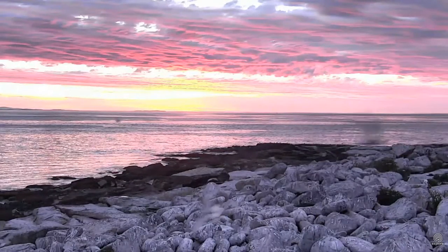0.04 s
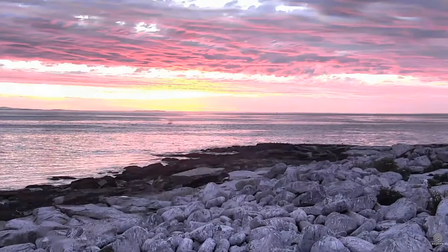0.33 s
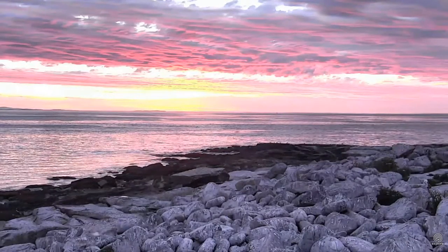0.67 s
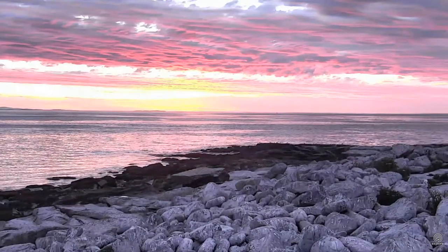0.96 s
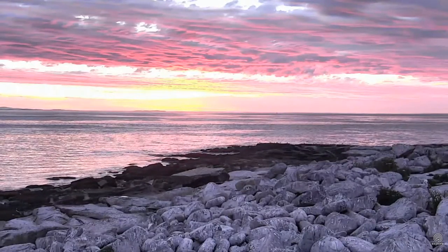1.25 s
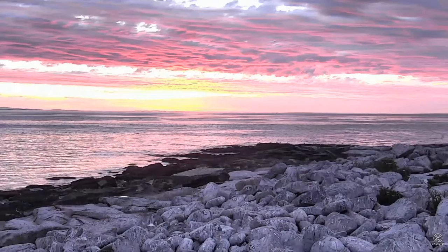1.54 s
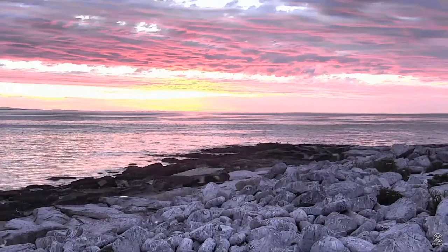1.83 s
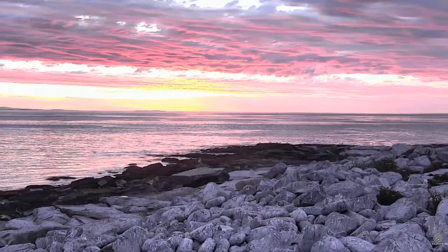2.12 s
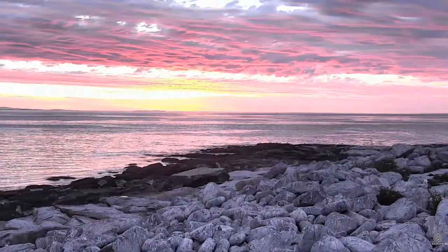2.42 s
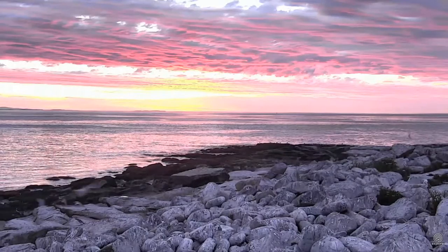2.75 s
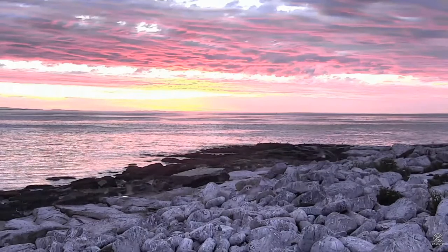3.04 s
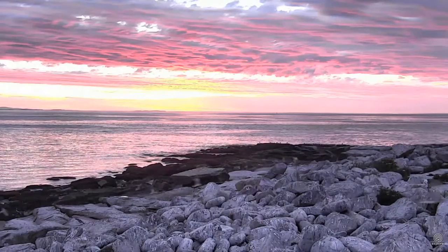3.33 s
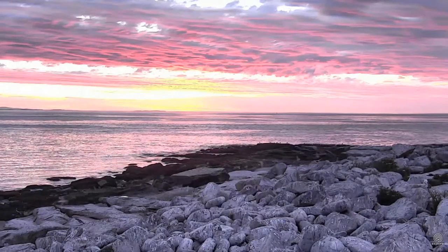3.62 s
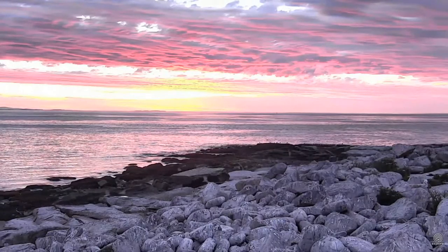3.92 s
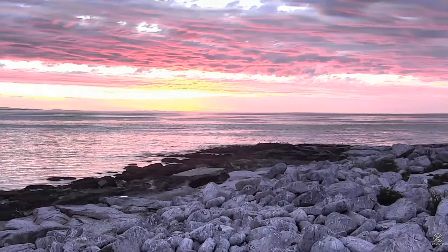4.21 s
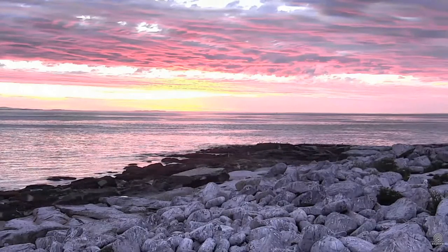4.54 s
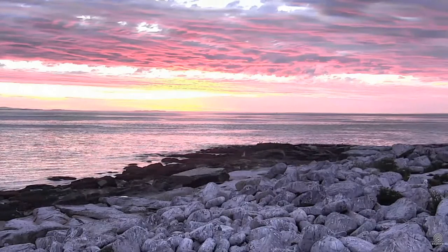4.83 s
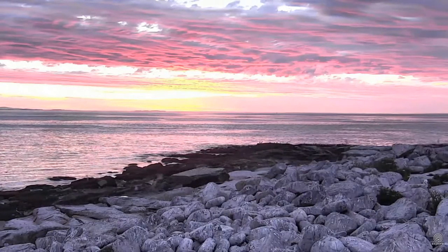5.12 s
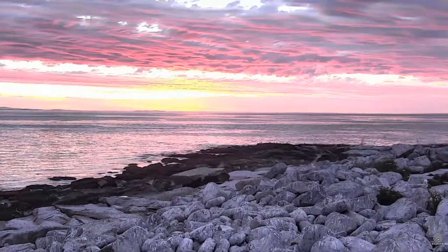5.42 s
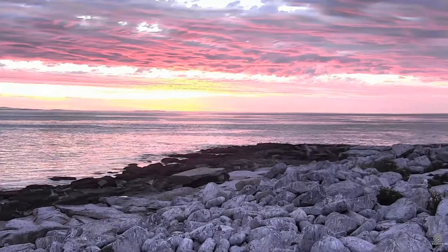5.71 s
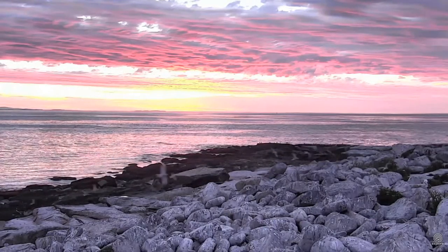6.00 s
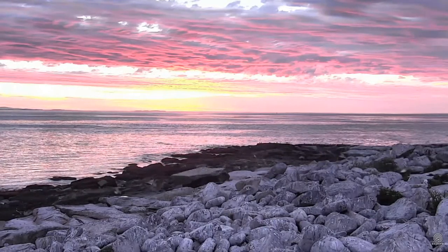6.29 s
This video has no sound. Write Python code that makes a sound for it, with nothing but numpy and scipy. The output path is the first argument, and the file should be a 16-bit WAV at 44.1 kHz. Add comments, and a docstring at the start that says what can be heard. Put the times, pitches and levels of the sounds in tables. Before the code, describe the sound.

A seabird screams harshly close to the microphone, its call arching up and dropping into a rattle. Other terns answer from around the rocky shore with short sharp notes, thin whistles, rasps and far cries. After a quieter middle stretch broken by one whistle, several nearer screams follow, the last the loudest. Underneath, the blurred voices of the colony swell and fade above a faint wash of sea.

```python
"""A rocky shore by a calm sea, home to a colony of terns. Birds pass close with harsh 'kee-arr' screams;
others answer with rasps, thin whistles, short 'kek' notes and far calls. A bird's voice box (the syrinx)
buzzes, its throat shapes the tone, and about forty bursts a second make a scream rattle.
The calls scatter off the rocks. Under them lie the din of the colony, faint water, clucks, and a low
rumble and hum. A soft low thump lies under the first loud scream; soft, distant hoots come later."""
import sys
import numpy as np
from scipy import signal
from scipy.fft import rfft, irfft, next_fast_len
from scipy.io import wavfile
from scipy.ndimage import uniform_filter1d

SR = 44100
rng = np.random.default_rng(int(sys.argv[2]) if len(sys.argv) > 2 else 0)


def generate_wav(signal):
    """Clip the signal to [-1, 1] and save it as 16-bit WAV at the path in sys.argv[1]."""
    frames = np.transpose(np.atleast_2d(signal))
    scaled = np.clip(frames, -1, 1) * 32767
    pcm = np.round(scaled).astype(np.int16)
    wavfile.write(sys.argv[1], SR, pcm)


N = 289296

# Levels are relative: they set the balance. Roughness runs from 0 (clean) to 1 (harsh).
# How the din of the colony swells and fades: (time [s], level [dB])
DIN_LEVELS = [(0, -24.5), (.55, -29), (.75, -39), (1.1, -30.5), (1.9, -40), (2.5, -35.5), (3.2, -33.5),
              (3.47, -37), (3.8, -35.5), (4.7, -33), (5, -45), (5.499, -25), (5.9, -31.5), (6.56, -24)]
# Tone curves, which say how strong each frequency is: (frequency [Hz], level [dB])
DIN_TONE = [(300, -2), (700, -9), (1100, 7), (1600, -3.5), (2050, 4), (2600, 8.5), (3200, -18), (4000, 2),
            (4800, -11.5), (6400, -45.5), (7600, -53)]  # many far voices blurred together
SEA_TONE = [(25, 5), (75, 6), (140, -9), (240, -5), (330, -6), (900, -7.5), (1500, -8), (3000, -7),
            (5000, -43.5), (7600, -49.5)]  # the wash of calm water
THROAT_TONE = [(300, -33.5), (800, -14), (1300, -7.5), (1750, -10), (2200, -5), (2750, 0.5), (3450, -0.5),
               (4200, -6), (5200, -8.5), (6100, -11), (6900, -11), (7700, -33)]  # a tern's throat and open bill
KEK_TONE = [(300, -4), (800, -12.5), (1300, -5.5), (1900, -6.5), (2700, -6.5), (4000, -12.5), (5300, -7),
            (6600, -13.5), (7700, -34.5)]  # the throat during a 'kek'
CLUCK_TONE = [(200, -41), (430, 1), (700, -6.5), (1000, 9.5), (1500, -3), (3000, -11)]  # the hollow ring of a cluck
# The notes of a low hum: (pitch [Hz], level [dB])
HUM_NOTES = [(60, -55), (120, -53)]
# Short 'kek' notes: (time [s], length [s], level [dB], pitch just above the arch's top [Hz])
KEK_NOTES = [(0.035, 0.024, -29.5, 1562), (0.841, 0.056, -33.5, 1316), (1.282, .043, -30, 1374),
             (1.54, 0.03, -36, 1205), (1.638, 0.027, -32.5, 1347), (1.724, 0.065, -22.5, 1332),
             (1.841, 0.016, -36.5, 1216), (1.931, 0.021, -33.5, 1528), (2.006, .043, -32, 1427),
             (2.104, .016, -33, 1500), (2.204, 0.017, -36, 1455), (5.335, 0.017, -31.5, 1146),
             (5.949, 0.027, -22, 1280), (6.438, .018, -30, 1236)]
# Lone clucks from among the rocks: (time [s], level [dB])
LONE_CLUCKS = [(.939, -40.5), (2.814, -39), (3.079, -38), (3.269, -43.5), (3.368, -45), (3.81, -41),
               (4.004, -38), (4.555, -40.5), (4.94, -40), (5.045, -39)]
# Near 'kee-arr' screams: (start [s], drop [s], upturn [s], end [s], syllable rate [1/s],
# opening pitch [Hz], top pitch [Hz], low pitch [Hz], closing pitch [Hz], 'kee' level [dB],
# first 'arr' level [dB], last 'arr' level [dB], closing level [dB], 'kee' roughness [0-1],
# last 'arr' roughness [0-1], throat sharpness [factor], snap of each syllable [factor])
KEE_ARR_SCREAMS = [ (.052, .178, .308, .333, 38.7, 1700, 1838, 1389, 1730, -10.5, -9, -14, -10.5, 0.07, .42, 0.8, .2),
                   (.8985, 1.012, 1.185, 1.21, 38.3, 1582, 1764, 1345, 1600, -23.5, -21, -21, -30, 0.14, 0.28, 1.7, 0.59),
                   (3.9955, 4.103, 4.228, 4.258, 38.35, 1510, 1748, 1353, 1345, -25.5, -27.5, -21, -25, 0.03, .6, 1.37, 1),
                   (4.574, 4.664, 4.85, 4.874, 39.7, 1606, 1763, 1385, 1583, -21, -22, -20.5, -22, 0.1, 0.28, 1.84, 3.2),
                   (5.3565, 5.502, 5.702, 5.73, 40.1, 1612, 1786, 1388, 1810, -20, -19.5, -16, -14.5, 0, .9, 1, 0.83),
                   (5.9766, 6.066, 6.268, 6.322, 40.7, 1203, 1685, 1375, 1767, -10, -8.5, -16.5, -17.5, 0.27, 1, 1.32, .25)]
# A soft low thump under the first loud scream, then soft, distant hoots:
# (time [s], length [s], level [dB], pitch [Hz])
THUMP_AND_HOOTS = [(0.087, 0.045, -52, 240), (4.417, 0.043, -40, 282), (5.22, 0.071, -44, 282),
                   (5.31, 0.092, -45.5, 321), (5.402, 0.076, -43, 300)]
# Thin whistles: (start [s], end [s], first level [dB], last level [dB], first pitch [Hz], top pitch [Hz],
# last pitch [Hz], peak [share of length], bend of the fall [1 = straight])
THIN_WHISTLES = [ (0.091, .345, -10, -14, 3320, 3387, 2770, 0.081, 0.72),
                 (1.612, 1.73, -39, -38, 2374, 2400, 2370, .2, 0.64),
                 (2.194, 2.272, -36, -39, 2880, 2870, 2590, 0.094, 0.45),
                 (2.974, 3.173, -21.5, -15, 3380, 3910, 3196, 0.36, 1.7),
                 (6.269, 6.384, -31, -35.5, 3740, 3550, 2165, 0.055, 0.74)]
# Rattling rasps: (start [s], end [s], syllable rate [1/s], first level [dB], last level [dB],
# pitch [Hz], roughness [0-1], snap [factor])
LOW_RASPS = [(.334, .435, 84, -17.5, -19.5, 1390, .65, .3), (6.4618, 6.575, 43, -17, -20.5, 1225, .45, .1)]
# Sinking cries of far seabirds: (start [s], end [s], level [dB], pitch [Hz])
FAR_CRIES = [(0.442, 0.685, -38, 1077), (2.93, 3.445, -39.5, 1106), (3.719, 3.846, -43, 1124)]
# Screams of far terns: (start [s], end [s], syllable rate [1/s], level [dB], pitch just above the
# arch's top [Hz], peak [share of length], last pitch [share of that pitch], treble tilt [dB])
FAR_TERN_SCREAMS = [ (0.519, .712, 78, -31, 1567, 0.99, 0.87, 1),
                    (1.319, 1.49, 41, -37, 1604, 0.063, 0.76, 2),
                    (2.372, 2.686, 42, -32, 1634, 0.25, 0.88, -2.5),
                    (2.76, 2.972, 42, -34, 1664, 0.56, 0.96, -0.5),
                    (3.54, 3.776, 42.7, -28, 1741, 0.33, 0.65, 5),
                    (3.865, 3.989, 42, -35.5, 1673, 0.41, 0.99, 3),
                    (4.337, 4.558, 42, -32.5, 1710, .25, 0.8, 0.5),
                    (4.884, 4.954, 42, -32, 1585, 0.12, 0.57, -3),
                    (5.027, 5.346, 47, -29.5, 1680, .62, 0.87, 0),
                    (5.727, 5.886, 44, -33, 1928, 0.28, 0.98, -6)]
# Clear chirps of far birds: (time [s], length [s], level [dB], top pitch [Hz])
FAR_CHIRPS = [(2.16, 0.045, -42, 1976), (2.53, 0.039, -34, 1806), (2.725, 0.093, -41, 1930),
              (3.28, 0.05, -39, 1550), (4.247, 0.068, -41, 1860), (5.214, 0.056, -28.5, 1888)]


def amp(db):
    """Turns decibels into a number to multiply by."""
    return 10 ** (np.asarray(db) / 20)


def evened(x):
    """Scales a sound to an average strength (rms) of 1."""
    return x / np.sqrt(np.mean(x ** 2) + 1e-20)


def add(mix, start, sound):
    """Mixes a sound in at a start time in seconds."""
    part = mix[max(round(start * SR), 0):][:len(sound)]
    part += sound[:len(part)]


def colour(x, curve, depth=1):
    """Shapes a sound with a tone curve; more depth makes its peaks stand out more."""
    size = next_fast_len(len(x) + 1024)
    curve_hz, curve_db = np.transpose(curve)
    hz = np.fft.rfftfreq(size, 1 / SR)
    db = np.interp(np.log(hz + 1), np.log(curve_hz), curve_db)
    return irfft(rfft(x, size) * amp(depth * db), size)[:len(x)]


def wander(size, hz):
    """A smooth random wobble, about as fast as hz."""
    full = next_fast_len(size + SR // 4)
    keep_slow = np.exp(-(np.fft.rfftfreq(full, 1 / SR) / hz) ** 2)
    return evened(irfft(rfft(rng.standard_normal(full)) * keep_slow, full))[:size]


def progress(start, end):
    """Runs from 0 to 1 over a call; named u below."""
    return np.linspace(0, 1, int((end - start) * SR))


def arch(u, first, top, last, peak, bend=2):
    """Curves from first to top at u = peak, then on to last at u = 1."""
    peak = np.clip(peak, .02, .98)
    rise, fall = np.clip(1 - u / peak, 0, 1), np.clip((u - peak) / (1 - peak), 0, 1)
    return top + (first - top) * rise ** 2 + (last - top) * fall ** bend


def syrinx(hz, rough, brightness=3.85):
    """The voice box makes a note with overtones; when forced, it shakes unevenly and rasps."""
    size = len(hz)
    phase = 2 * np.pi * np.cumsum(hz * (1 + .056 * rough * wander(size, 540))) / SR
    # strong and weak cycles take turns, which adds tones between the overtones
    sway = rough * np.cos(phase / 2 + 1.46 * wander(size, 140))
    buzz = sum(np.cos(k * (phase + .41 * sway)) / (1 + (k / brightness) ** 6) for k in range(1, 7))
    breath = evened(signal.lfilter(*signal.butter(2, 6000, fs=SR), rng.standard_normal(size)))
    return evened(buzz * (1 + 1.02 * sway)) + (.062 + .38 * rough ** 1.5) * breath


def syllables(rate, db, hz, rough, sharpness, snap, duty=.87, gap_db=-24, slack_hz=1510,
              snap_rough=.25, pull=.8, sag=.0383, release_s=.008, uneven_db=1.98):
    """The voice box opens in quick bursts, or syllables; each snaps on roughly, then rings."""
    size = len(hz)
    cycle = np.arange(size) / SR * rate % 1  # 0 to 1 within each syllable
    low = np.clip((1650 - hz) / 200, 0, 1)  # 1 in the harsh low voice, 0 in the high one
    # the harsher the voice, the sooner each syllable is choked off
    is_open = cycle < np.clip(duty, .6, .8) - .06 * rough
    gate = uniform_filter1d(is_open * 1., size=50) * amp(-2 * low * cycle)
    onset = np.exp(-(cycle / .26) ** 2)
    # the pitch leaps away from that of the slack membrane, sags, and slides back at the end
    slack = np.exp(-cycle / .0512) + np.minimum(cycle / duty, 1) ** 9
    hz = hz + pull * slack * (slack_hz - hz)
    hz *= 1 + .00955 * wander(size, 50.2) - sag * (cycle - duty / 2)
    hz *= 1 + low * (.03975 * onset ** 2 + .0071 * wander(size, 123.4))  # low ones start high and waver
    attack = 1 + snap * onset * (.019 + np.clip(rough, 0, 1))
    rough = np.clip(rough * (1.2 - .5 * cycle) + snap_rough * onset ** 2 * low + .36 * cycle ** 4, 0, 1)
    buzz = syrinx(hz, rough)
    # in the low voice the bill closes a little and the throat rings more sharply
    voice = (1 - low) * colour(buzz, THROAT_TONE, sharpness * .6)
    voice += low * colour(buzz, THROAT_TONE, sharpness * .98)
    voice = signal.lfilter(*signal.butter(2, 700, "high", fs=SR), voice)
    voice /= np.sqrt(uniform_filter1d(voice ** 2, size=400) + 1e-12)  # hold the level steady
    uneven = amp(uneven_db * (1 + low) / 2 * wander(size, 23))
    beats = evened((gate + amp(gap_db)) * attack * uneven)
    release = np.minimum((size - np.arange(size)) / (release_s * SR), 1)
    return amp(db) * voice * beats * signal.windows.tukey(size, .025) * release


def rocks(x, scatter_db, fade_s, ground=.097):
    """Adds one bounce off the ground and many faint echoes from the boulders."""
    t = np.arange(SR // 2) / SR
    echoes = rng.standard_normal(len(t)) * (rng.random(len(t)) < 2000 / SR)
    echoes *= amp(-60 * t / fade_s) * (t > .004)
    echoes *= amp(scatter_db) / np.linalg.norm(echoes)
    echoes[int(.0037 * SR)] += ground
    return x + signal.fftconvolve(x, echoes)[:N]


def colony(count=34, call_s=.41, peak=.25):
    """Many far terns scream at random and blur into a din."""
    voices, u = np.zeros(N), progress(0, call_s)
    for k, (when, pitch, loud, speed) in enumerate(rng.random((count, 4))):
        db = 5 * loud + arch(u, -8.5, 0, -4.5, peak)
        hz = (1350 + 420 * pitch) * arch(u, .79, 1, .76, peak)
        voice = syllables(34 + 16 * speed, db, hz, rough=.14, sharpness=1, snap=.3, pull=.5)
        swell = amp(3 * wander(len(u), 16))
        add(voices, (k + when) * N / SR / count - .15, voice * swell)
    blur = evened(colour(rng.standard_normal(N), DIN_TONE))
    din = evened(rocks(voices, scatter_db=-8, fade_s=.5)) + .45 * blur
    return din * amp(np.interp(np.arange(N) / SR, *np.transpose(DIN_LEVELS)) - 3)


def shore(wash_db=-40.5, swell_db=1.55, rumble_db=-46):
    """The calm sea washes faintly over a low rumble and hum."""
    wash = amp(wash_db + swell_db * wander(N, 6.3)) * evened(colour(rng.standard_normal(N), SEA_TONE))
    rumble = colour(rng.standard_normal(N), [(15, -23.5), (45, 0), (90, 3), (150, -27), (600, -63.5)])
    t = np.arange(N) / SR
    hum = sum(amp(db) * np.sin(2 * np.pi * hz * t + .4 * wander(N, 3)) for hz, db in HUM_NOTES)
    return wash + amp(rumble_db) * evened(rumble) + np.sqrt(2) * hum


def kek(start, length, db, hz, settle_s=.075):
    """One short syllable whose pitch rises, then drops and cracks; the shorter, the rougher."""
    u = progress(0, length)
    crack = .85 * u ** 4
    rough = np.clip(1.05 * (1 - length / settle_s) + crack, 0, 1)
    voice = colour(syrinx(hz * arch(u, .68, .97, .82, peak=.68), rough), KEK_TONE)
    return start, amp(db) * evened(voice * signal.windows.tukey(len(u), .85))


def cluck(start, db, length=.05, hz=240):
    """A low, hoarse note that sinks and quickly fades."""
    u = progress(0, length)
    voice = colour(syrinx(hz * (1.1 - .39 * u), rough=.89), CLUCK_TONE)
    return start - .008, amp(db - 4) * evened(voice * u * np.exp(-5 * u))


def near_scream(start, drop, upturn, end, rate, opening_hz, top_hz, low_hz, closing_hz,
                kee_db, first_db, last_db, closing_db, kee_rough, last_rough, sharpness, snap,
                switch_s=.012, peak=.55, first_rough=.027, closing_rough=.21):
    """An arching 'kee' drops to a level 'arr' that grows harsher, then mostly turns up to close."""
    t = np.arange(start, end, 1 / SR)
    spans = (start, drop), (drop, upturn), (upturn, end)
    kee, arr, tail = (np.clip((t - a) / (b - a), 0, 1) for a, b in spans)
    dropped, closing = (np.clip((t - at) / switch_s + .5, 0, 1) for at in (drop, upturn))

    def joined(high, low, last):
        """Glides through the three parts of the call."""
        return (1 - dropped) * high + (dropped - closing) * low + closing * last

    hz = joined(arch(kee, opening_hz, top_hz, .92 * top_hz, peak), low_hz, closing_hz * (1 - .1 * tail))
    arr_db = first_db + (last_db - first_db) * arr
    db = joined(kee_db + arch(kee, -4, 0, 1.5, peak), arr_db, closing_db - 3 * tail)
    rough = joined(kee_rough, first_rough + (last_rough - first_rough) * arr, closing_rough)
    return start, syllables(rate, db, hz, rough, sharpness, snap)


def thump_or_hoot(start, length, db, hz):
    """A brief, almost pure low note, heard as a soft thump or a distant hoot."""
    size = int(length * SR)
    phase = 2 * np.pi * np.cumsum(hz * (1 + .072 * wander(size, 60))) / SR
    return start, amp(db) * evened(np.sin(phase) * np.hanning(size))


def whistle(start, end, first_db, last_db, first_hz, top_hz, last_hz, peak, bend):
    """A thin, fluttering whistle; its overtone, an octave up, fades as the pitch climbs."""
    u = progress(start, end)
    hz = arch(u, first_hz, top_hz, last_hz, peak, bend)
    phase = 2 * np.pi * np.cumsum(hz * (1 + .012 * wander(len(u), 300))) / SR
    flutter = 1 + .5 * np.tanh(wander(len(u), 100))
    octave = amp(-12) / (1 + (hz / 3400) ** 12)
    tone = evened((np.sin(phase) + octave * np.sin(2 * phase)) * flutter)
    return start, amp(first_db + (last_db - first_db) * u) * tone * signal.windows.tukey(len(u), .1)


def rasp(start, end, rate, first_db, last_db, hz, rough, snap):
    """A harsh rattle of syllables on one low pitch."""
    u = progress(start, end)
    db = first_db + (last_db - first_db) * u
    return start, syllables(rate, db, np.full(len(u), hz), rough, 1.05, snap, duty=.7, pull=.36)


def cry(start, end, db, hz, sink=.09):
    """A drawn-out, slightly hoarse note that sinks."""
    u = progress(start, end)
    pitch = hz * (1 - sink * u + .0275 * wander(len(u), 60))
    voice = colour(syrinx(pitch, rough=.49, brightness=4.16), THROAT_TONE, depth=.28)
    voice = signal.lfilter(*signal.butter(2, 700, "high", fs=SR), voice)
    return start, amp(db + 6.2 * wander(len(u), 30)) * evened(voice * signal.windows.tukey(len(u), .3))


def far_scream(start, end, rate, db, hz, peak, fall, tilt_db):
    """One arch of soft syllables that each slide down; brighter when the bird faces this way."""
    u = progress(start, end)
    level, pitch = db + arch(u, -2.5, 0, -5, peak), hz * arch(u, .83, .98, fall, peak)
    voice = syllables(rate, level, pitch, rough=.16, sharpness=.78, snap=.19, duty=.66, gap_db=-22.5,
                      snap_rough=.073, pull=.63, sag=.11, uneven_db=2.9)
    facing = colour(voice, [(1600, -tilt_db / 2), (3200, 0), (5500, tilt_db)])
    return start, facing * np.std(voice) / np.std(facing)


def chirp(start, length, db, hz):
    """A short, clean arch sung through a wide-open throat."""
    u = progress(0, length)
    voice = colour(syrinx(hz * (1 - .38 * (u - .45) ** 2), rough=.034), THROAT_TONE, depth=.78)
    return start, amp(db) * evened(voice * signal.windows.tukey(len(u), .5))


def scene():
    """Near birds have almost no echo; far ones come with more scatter from the rocks."""
    near, far = np.zeros(N), np.zeros(N)
    for mix, source, table in (
            (near, near_scream, KEE_ARR_SCREAMS), (near, rasp, LOW_RASPS),
            (near, whistle, THIN_WHISTLES), (near, kek, KEK_NOTES),
            (far, far_scream, FAR_TERN_SCREAMS), (far, cry, FAR_CRIES), (far, chirp, FAR_CHIRPS),
            (far, cluck, LONE_CLUCKS), (far, thump_or_hoot, THUMP_AND_HOOTS)):
        for row in table:
            add(mix, *source(*row))
    for start, length, db, _ in KEK_NOTES:  # a softer cluck lies under each 'kek'
        add(far, *cluck(start + .62 * length, db - 8))
    near = rocks(near, scatter_db=-18, fade_s=.16, ground=.05)
    far = amp(-2) * rocks(far, scatter_db=-5, fade_s=.11, ground=.35)
    return (near + far + colony() + shore())[None]


def record(dry, lopsided=.018, ceiling=.8, cutoff_hz=7750):
    """The microphone bends and rounds off the loudest screams; then the highest treble is cut."""
    bent = dry + lopsided * signal.lfilter(*signal.butter(2, 200, "high", fs=SR), dry ** 2)
    rounded = bent / (1 + (bent / ceiling) ** 8) ** (1 / 8)
    treble_cut = signal.firwin(401, cutoff_hz, window=("kaiser", 9), fs=SR)
    return signal.oaconvolve(rounded, treble_cut[None], "same")


dry = scene()
out = record(dry)
generate_wav(out)
```